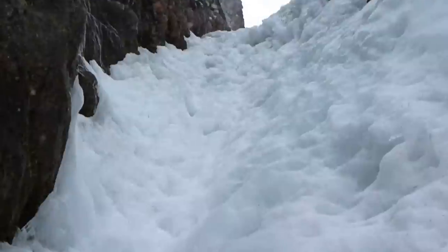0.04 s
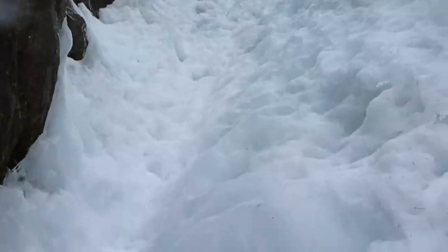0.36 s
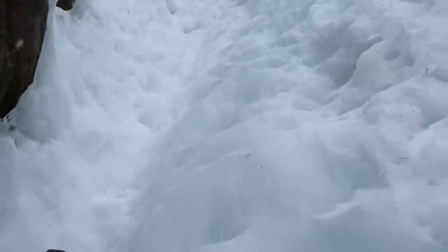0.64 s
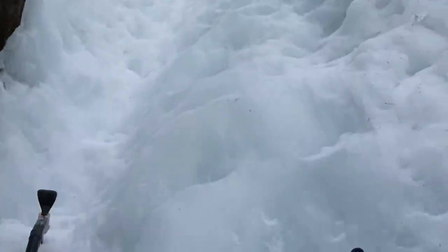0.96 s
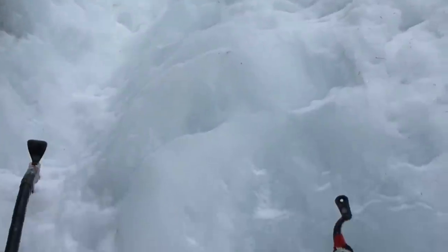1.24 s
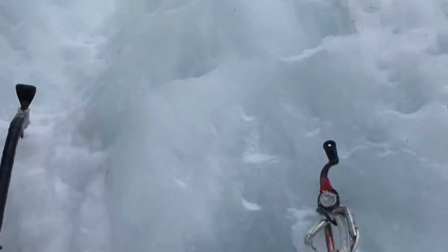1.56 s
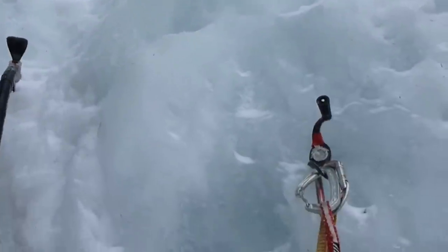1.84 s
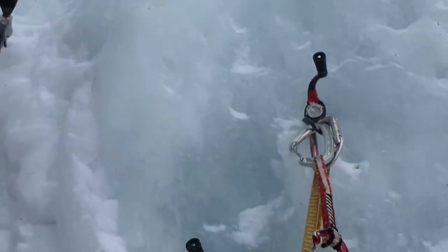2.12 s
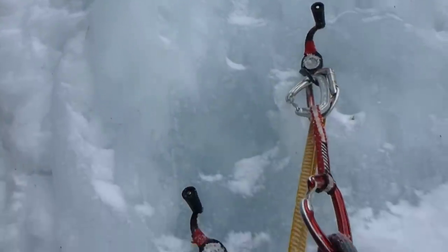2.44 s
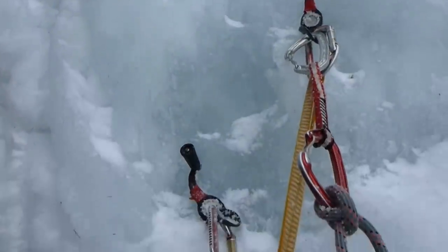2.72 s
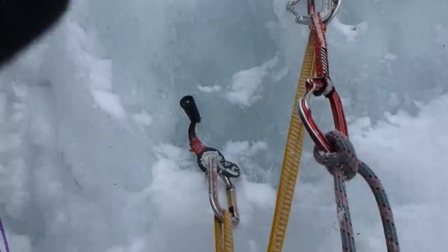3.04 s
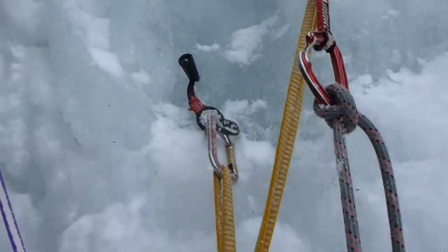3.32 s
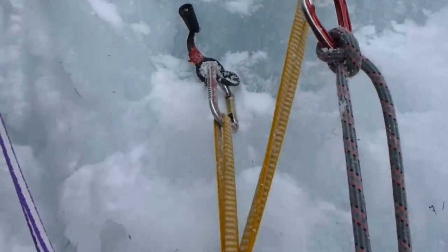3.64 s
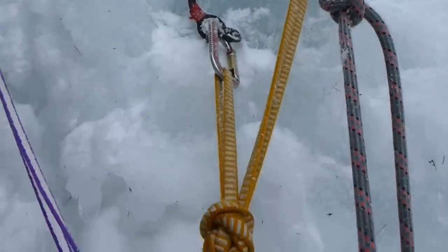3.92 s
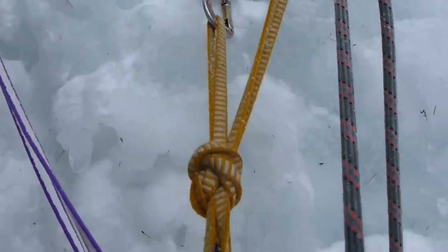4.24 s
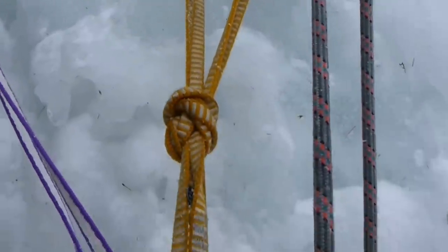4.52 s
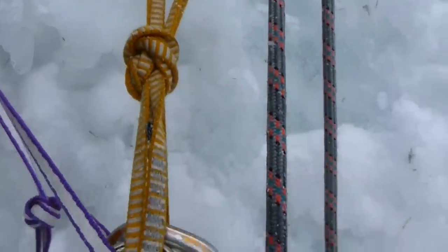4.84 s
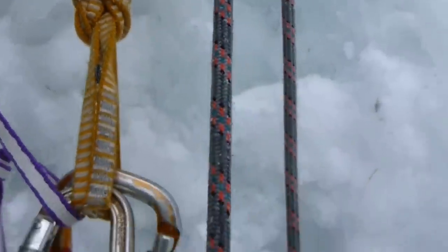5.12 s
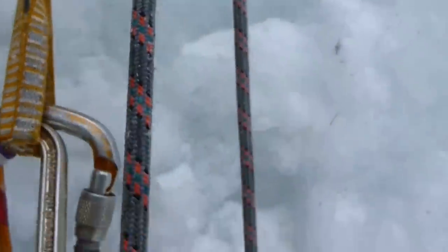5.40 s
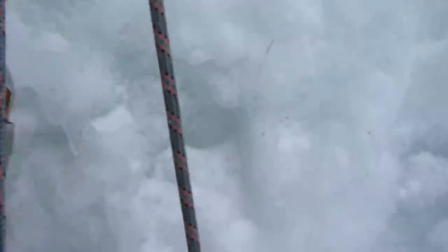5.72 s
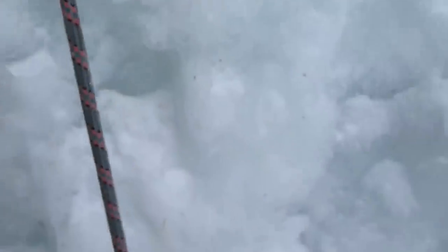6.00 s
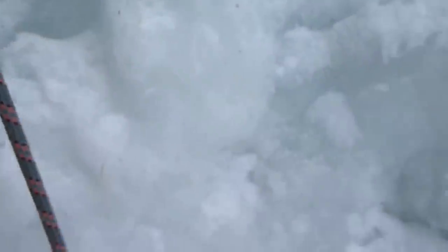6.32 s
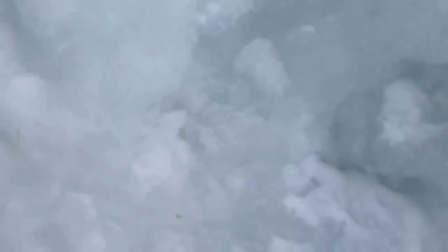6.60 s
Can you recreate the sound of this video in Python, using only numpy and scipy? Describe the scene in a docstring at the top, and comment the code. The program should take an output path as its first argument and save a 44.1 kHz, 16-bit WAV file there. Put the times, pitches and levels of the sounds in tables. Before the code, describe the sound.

Fine snow hisses over ice in a low, even wind, heard outdoors on a hand-held microphone that small ice grains tap at intervals. Before the middle, carabiners and slings settle with close, dry clicks and one hollow knock, mixed with the rustle of a nylon sleeve. Low gusts then begin to buffet the microphone with soft thumps, and a brittle tick of ice stands out near the end.

```python
"""An icy gully, heard by a small hand-held camera at a belay: spindrift hisses down in steady wind.
Ice grains tick on the camera and set its case ringing. Climbing gear shifts under load, crackles
and ends in a hollow knock, while a nylon sleeve swishes and creases. Towards the end, gusts
rumble on the microphone port and single eddies thump against it."""
import sys
import numpy as np
from scipy import signal
from scipy.fft import rfft, irfft, next_fast_len
from scipy.io import wavfile
from scipy.ndimage import uniform_filter1d, map_coordinates

SR = 44100
rng = np.random.default_rng(int(sys.argv[2]) if len(sys.argv) > 2 else 0)


def pcm_store(signal):
    """Save signal as 16-bit PCM."""
    levels = np.round(np.clip(np.atleast_2d(signal), -1, 1) * 32767)
    wavfile.write(sys.argv[1], SR, levels.astype(np.int16).T)


N = 298116
TIME = np.arange(N) / SR
START_S = 0.17  # silence until here

# The tone of a dry click, for gear and creasing nylon. Each row: frequency in Hz, relative level in dB.
CLICK_SPECTRUM = [(100, -11), (1000, -10.5), (1700, -4), (2400, -1.5), (3600, 0.5), (4400, -2), (5400, 1),
                  (7400, -7), (10000, -4), (12500, -8), (15000, -5.5), (17000, -8)]


def amp(db):
    return 10 ** (np.asarray(db) / 20)


def unit(x):
    return x / np.sqrt(np.mean(x ** 2) + 1e-20)


def wobble(rate):
    """A smooth random curve, rate knots a second."""
    return map_coordinates(rng.standard_normal(int(N * rate / SR) + 4), [TIME * rate])


def swell(s, half_length, steepness=2):
    """A smooth rise and fall around time s, 1 at its crest."""
    return np.exp(-np.abs((TIME - s) / half_length) ** steepness)


def gain(points, hz):
    """Gain of (Hz, dB) points joined on a log axis."""
    f, db = np.transpose(points)
    return amp(np.interp(np.log(hz + 1), np.log(f + 1), db))


def filtered(x, response):
    """x through a complex frequency response."""
    size = next_fast_len(N + SR // 4)
    return irfft(rfft(x, size) * response(np.fft.rfftfreq(size, 1 / SR)), size)[:N]


def resonance(f, hz, width):
    """Causal response of one damped mode."""
    return 1j * f * width / (hz * hz - f * f + 1j * f * width)


def band(x, hz, width_hz):
    """x through the same resonance twice."""
    return filtered(x, lambda f: resonance(f, hz, width_hz) ** 2)


def snap(points, size=512):
    """The shortest causal pulse with this spectrum, energy 1."""
    cepstrum = irfft(np.log(gain(points, np.fft.rfftfreq(size, 1 / SR))))
    cepstrum[1:size // 2] *= 2
    cepstrum[size // 2 + 1:] = 0
    pulse = irfft(np.exp(rfft(cepstrum)))
    return pulse / np.linalg.norm(pulse)


def rush(spectrum, patchy_db):
    """Coloured noise of rms 1 with drifting patches of gain."""
    frames = signal.stft(rng.standard_normal(N), nperseg=512)[2]
    patches = uniform_filter1d(rng.standard_normal(frames.shape), size=7, axis=0)
    patches = uniform_filter1d(patches, size=16, axis=1)
    noise = signal.istft(frames * amp(patchy_db * unit(patches)), nperseg=512)[1][:N]
    return unit(filtered(noise, lambda hz: gain(spectrum, hz)))


def contact(chatter, t60, size=512):
    """Force of a hard contact: one spike, then a dying chatter; energy 1."""
    force = rng.standard_normal(size) * amp(-60 * np.arange(size) / SR / t60)
    force *= chatter / np.linalg.norm(force)
    force[0] = 1
    return force / np.linalg.norm(force)


def add(track, s, sound):
    """Mix a sound into the track at time s."""
    part = track[max(round(s * SR), 0):][:len(sound)]
    part += sound[:len(part)]


def gully():
    """Wind roars softly over a faint low drone while fine snow slides over the ice."""
    # The dark roar of the wind. Each row: frequency in Hz, relative level in dB.
    wind_spectrum = [(20, -37), (45, -6), (80, -5.5), (120, -6), (170, -3), (300, -2.5), (500, -5.5),
                     (800, -8.5), (1400, -12), (2500, -16.5), (3500, -32.5), (6000, -86)]
    # The bright hiss of sliding snow. Each row: frequency in Hz, relative level in dB.
    snow_spectrum = [(300, -25), (1500, -21), (2600, -1.5), (3500, 1.5), (6000, -3), (10000, -7),
                     (13000, -8.5), (16000, -16)]
    rise_db = 0.13 * TIME  # the wind slowly picks up and carries more snow
    wind = amp(-46 + rise_db + 0.52 * wobble(5.2)) * rush(wind_spectrum, patchy_db=1.13)
    snow = amp(-54.5 + rise_db + 0.27 * wobble(10)) * rush(snow_spectrum, patchy_db=0.7)
    drone = unit(band(rng.standard_normal(N), hz=117.5, width_hz=15.4))
    return wind + snow + amp(-57) * drone


def sizzle(count=130):
    """The finest grains patter at random high pitches, thinning out as the spindrift passes."""
    base_db, spread_db, fade_db_per_s = -46, 13.5, 1.5
    thinning_s, lowest_hz, range_hz = 1.3, 8500, 7000
    out, t = np.zeros(N), np.arange(SR // 300) / SR
    for when, pitch, size in rng.random((count, 3)):
        s = START_S - thinning_s * np.log(1 - when)
        cycles = t * (lowest_hz + range_hz * pitch)
        db = base_db - fade_db_per_s * s + spread_db * size ** 2
        add(out, s, amp(db - 2.1 * cycles) * np.sin(2 * np.pi * cycles))
    return out


def sleeve():
    """Stiff nylon crackles as it bends and swishes as it slides; later it gives one dull scuff."""
    # Arm strokes. Each row: middle in seconds, half length in seconds, swish in dB, crackle in dB.
    strokes = [(2.34, .06, -52, -46.5), (2.62, 0.17, -62, -57), (2.803, .042, -50, -53),
               (2.996, 0.06, -45, -57)]
    # The swish of rubbing nylon. Each row: frequency in Hz, relative level in dB.
    nylon_spectrum = [(200, -14), (1200, -5), (2700, -9), (3450, 3), (3750, 1), (4300, -11), (4950, 1),
                      (6100, -1), (7200, -14), (9000, -12), (10400, -6), (12300, -16), (14700, -10),
                      (16000, -16)]
    folds_per_s = 1500  # tiny snaps of the creasing cloth
    sliding, bending = np.zeros((2, N))
    for s, half_length, swish_db, crackle_db in strokes:
        speed = swell(s, half_length, steepness=4.5)  # an arm starts and stops faster than a gust
        sliding += amp(swish_db) * speed
        bending += amp(crackle_db) * speed
    folds = (rng.random(N) < folds_per_s / SR) * rng.standard_normal(N)
    crisp = unit(np.convolve(folds, snap(CLICK_SPECTRUM))[:N])
    dull = unit(band(folds, hz=1800, width_hz=2000))
    crackle = unit(crisp + amp(-4) * dull)
    rasp = unit(band(rng.standard_normal(N), hz=1950, width_hz=1300))
    scuff = amp(-43) * swell(s=5.575, half_length=0.009) * rasp
    case_ring = unit(band(rng.standard_normal(N), hz=3560, width_hz=180))  # driven by the rubbing
    swish = rush(nylon_spectrum, patchy_db=0.7) + amp(-8) * case_ring
    return sliding * swish + bending * crackle + scuff


def gusts():
    """Turbulence rumbles on the port as gusts pass; each big eddy is one push and pull of pressure."""
    # Gusts at the port. Each row: crest in seconds, level in dB, half length in seconds.
    swells = [(1.033, -50, .1), (4.3, -41.5, .07), (4.877, -45.5, 0.23), (5.106, -35.5, 0.037),
              (5.412, -39.5, 0.076), (5.62, -38.5, 0.12), (5.97, -31.5, 0.073), (6.268, -33, 0.069),
              (6.44, -40.5, 0.032), (6.74, -48.5, 0.076)]
    # The rumble of turbulence. Each row: frequency in Hz, relative level in dB.
    rumble_spectrum = [(20, -26), (42, -6.5), (80, 1), (130, -0.5), (200, -9), (330, -19), (500, -31),
                       (1000, -66)]
    # Single eddies that hit the port. Each row: middle in seconds, relative level in dB, pitch in Hz.
    eddies = [(4.813, -23, 117), (5.112, -27, 149), (5.533, -20, 150), (5.641, -21.5, 134),
              (5.888, -24, 140), (5.930, -14.5, 139), (5.953, -21, 150), (6.004, -21.5, 227),
              (6.201, -20, 169), (6.237, -10.5, 178), (6.381, -25, 119)]
    strength = sum(amp(db) * swell(s, half_length) for s, db, half_length in swells)
    out = strength * rush(rumble_spectrum, patchy_db=0.5)
    for s, db, hz in eddies:
        phase = 2 * np.pi * hz * np.arange(-SR // 50, SR // 50) / SR
        thump = -amp(db + 2.0) * np.sin(phase) / np.cosh(phase / 1.72)
        add(out, s - len(phase) / 2 / SR, thump)
    return out


def ice_grains():
    """Grains snap on the camera and ring briefly; the heavier ones also knock its case."""
    # Grain hits. Each row: start in seconds, relative level in dB, ring send in dB, ring pitch in Hz.
    hits = [(0.2219, -22, -23, 3960), (0.4932, -34.5, -21, 4930), (0.5352, -37, -10, 4760),
            (0.556, -34, -19, 4680), (0.9195, -26.5, -27, 3750), (1.5728, -32.5, -13, 3200),
            (3.4467, -38, -12, 3840), (4.58, -31.5, -11, 5200), (5.307, -29.5, -22, 3880),
            (5.707, -19, -8, 3740), (6.1077, -20.5, -8, 6230), (6.129, -27.5, -1.5, 3680),
            (6.3909, -34, -16, 3290), (6.488, -24, -21, 3470), (6.6615, -11.5, -10.5, 6100)]
    # The brittle snap of ice. Each row: frequency in Hz, relative level in dB.
    snap_spectrum = [(300, -23.5), (3000, -4.5), (5000, -9), (7300, -7.5), (9500, -2.5), (11500, 0),
                     (13800, -4.5), (16500, -2.5)]
    heavy_db, knock_slope = -10, 1.1  # a heavy grain; dB of knock share lost per dB lighter
    bright, ring, knock = np.zeros((3, N))
    t = np.arange(SR // 50) / SR
    for s, db, ring_db, ring_hz in hits:
        force = amp(db) * contact(chatter=2.6, t60=0.0068)
        cycles = t * ring_hz
        ring_level = amp(db + ring_db - 1.76 * cycles)  # loses the same share each cycle
        knock_share = amp(-11 + knock_slope * (db - heavy_db))
        add(bright, s, force)
        add(ring, s, ring_level * np.sin(2 * np.pi * cycles))
        add(knock, s, knock_share * force)
    snaps = np.convolve(bright, snap(snap_spectrum))[:N]
    return amp(13.5) * snaps + amp(6) * ring + amp(23) * band(knock, hz=650, width_hz=1900)


def gear():
    """Slings and karabiners settle in dry clicks, ending in a hollow knock on the camera."""
    # Gear shifting under load. Each row: start in seconds, relative level in dB, dull send in dB.
    shifts = [(2.1833, -32, -2), (2.255, -30.5, -16), (2.2742, -28.5, -9), (2.2852, -27, -16),
              (2.326, -14.5, -4), (2.335, -19.5, -2), (2.356, -27, -4), (2.3717, -26.5, 1),
              (2.3885, -25.5, -9), (2.4128, -28, -14), (2.464, -32.5, -6), (2.4723, -32.5, -5),
              (2.523, -24.5, -5), (2.538, -30, -3), (2.724, -30, -13), (2.745, -29, -12),
              (2.7729, -18, -11), (2.8064, -17.5, 0), (2.8212, -9, -13)]
    # Blows that reach the camera body. Each row: start in seconds, relative level in dB.
    knocks = [(2.3263, -25), (2.8072, -23), (2.8217, -7)]
    # Modes of the camera body. Each row: pitch in Hz, relative level in dB, 60 dB decay in seconds.
    body_modes = [(142, -13.5, 0.033), (213, 1, 0.013), (557, -3, 0.0044), (1250, -5.5, 0.0054)]
    clicks, dull, thud = np.zeros((3, N))
    for s, db, dull_db in shifts:
        force = amp(db) * contact(chatter=1.3, t60=0.0075)
        add(clicks, s, force)
        add(dull, s, amp(dull_db) * force)
    t = np.arange(SR // 10) / SR
    body_ring = sum(amp(db - 60 * t / t60) * np.sin(2 * np.pi * hz * t) for hz, db, t60 in body_modes)
    for s, db in knocks:
        add(thud, s, -amp(db) * body_ring)
    snaps = np.convolve(clicks, snap(CLICK_SPECTRUM))[:N]
    snaps = filtered(snaps, lambda f: 1 + amp(-2) * resonance(f, 3550, 260))  # the case rings on briefly
    tock = band(dull, hz=1200, width_hz=2200)
    thud = signal.sosfilt(signal.butter(3, 120, "highpass", fs=SR, output="sos"), thud)
    return amp(10) * snaps + amp(18) * tock + thud


def scene():
    """The bed of wind and snow with the close sounds on top, in mono."""
    return (gully() + gusts() + ice_grains() + sizzle() + gear() + sleeve())[None]


def record(dry):
    """The camera opens after a moment, has three notches and cuts the top treble steeply."""
    # Notches in the camera's response. Each row: centre in Hz, width in Hz.
    notches = [(2900, 184), (7850, 87), (11750, 1400)]
    top_hz = 16100
    response = lambda f: np.prod([1 - resonance(f, hz, width) for hz, width in notches], axis=0)
    sound = filtered(dry[0], response) * (TIME > START_S)
    return filtered(sound, lambda hz: 1 / np.sqrt(1 + (hz / top_hz) ** 200))[None]


dry = scene()
out = record(dry)
pcm_store(out)
```